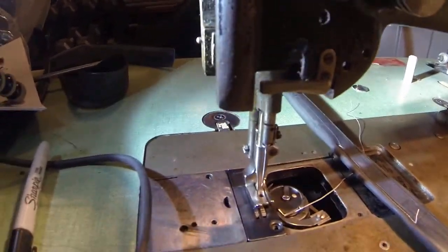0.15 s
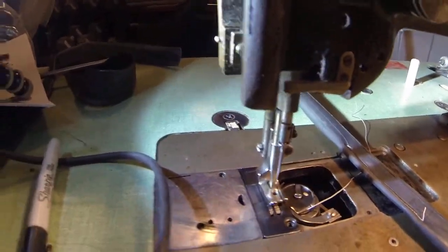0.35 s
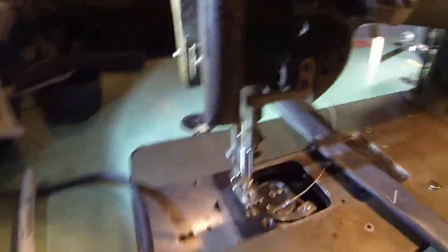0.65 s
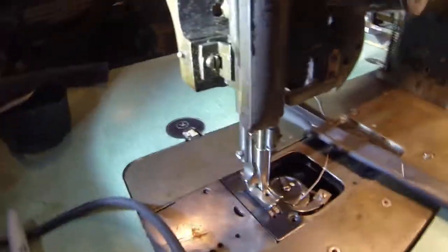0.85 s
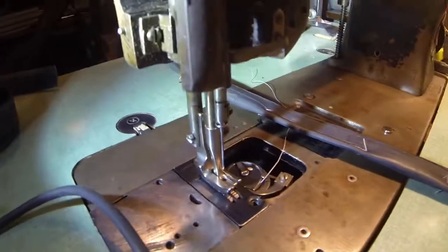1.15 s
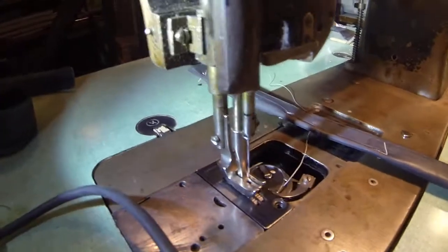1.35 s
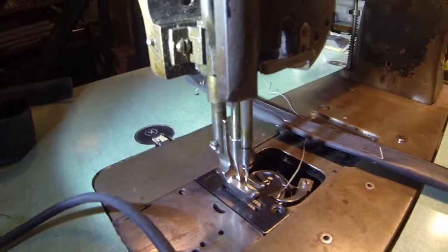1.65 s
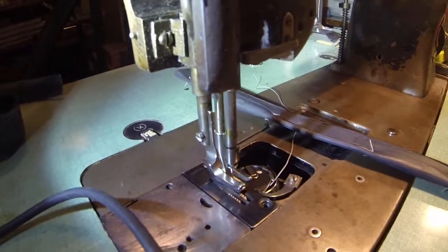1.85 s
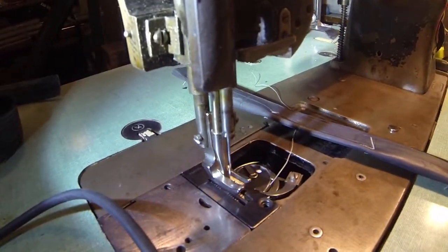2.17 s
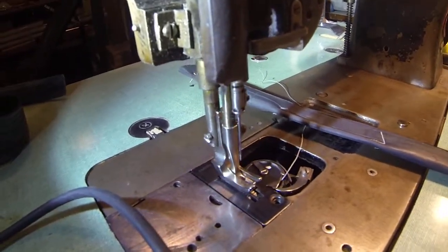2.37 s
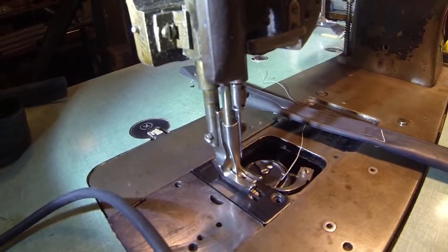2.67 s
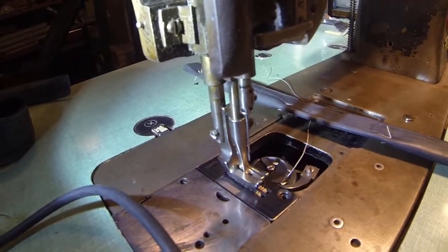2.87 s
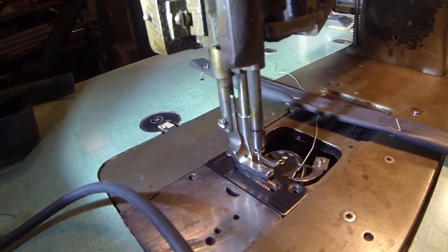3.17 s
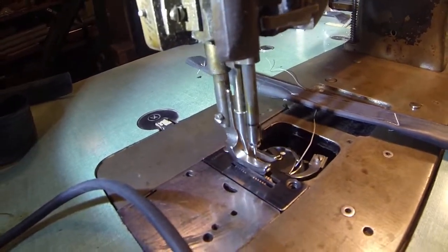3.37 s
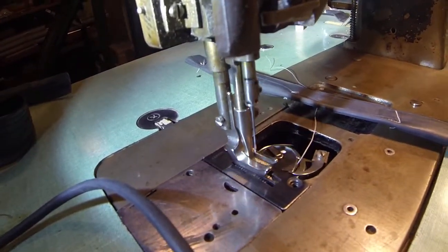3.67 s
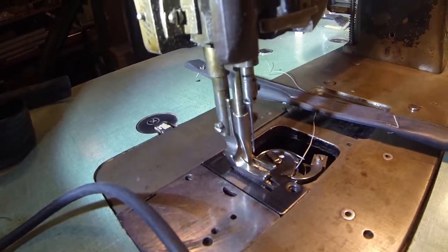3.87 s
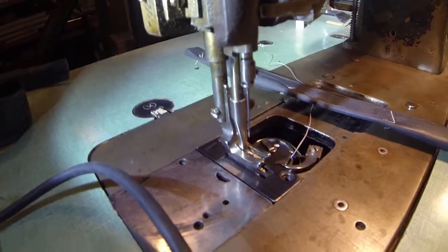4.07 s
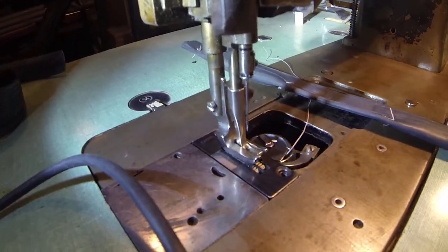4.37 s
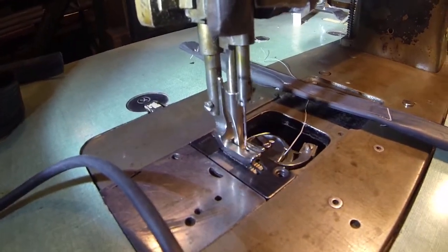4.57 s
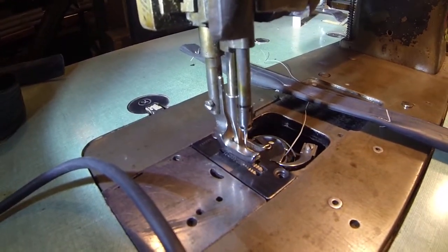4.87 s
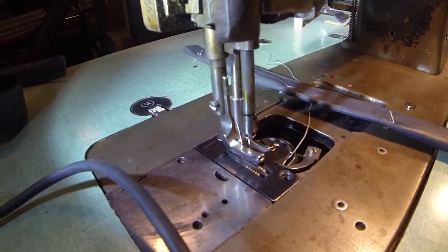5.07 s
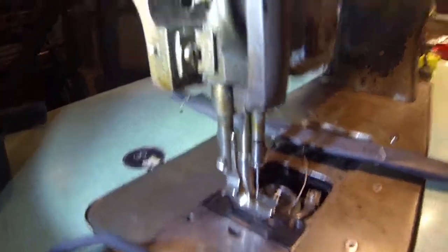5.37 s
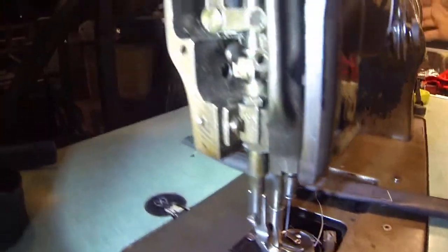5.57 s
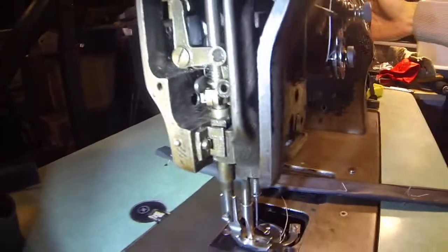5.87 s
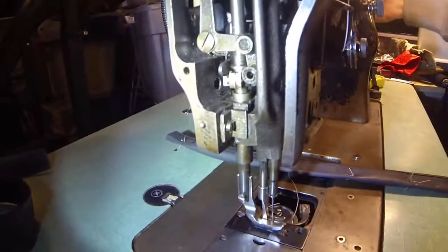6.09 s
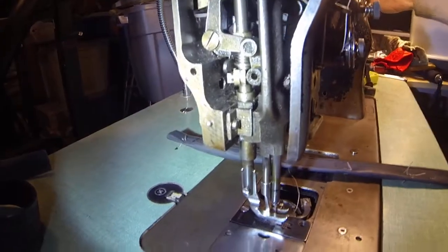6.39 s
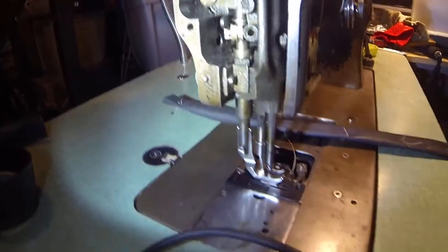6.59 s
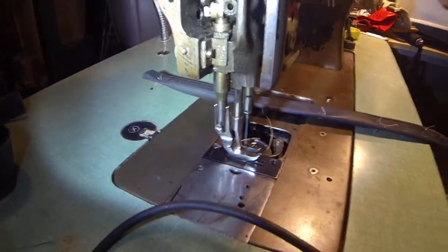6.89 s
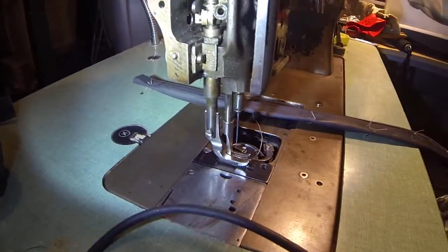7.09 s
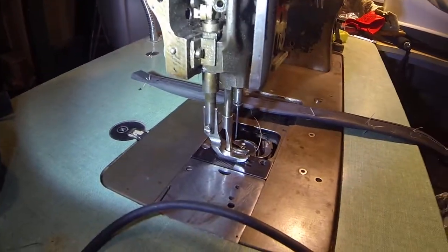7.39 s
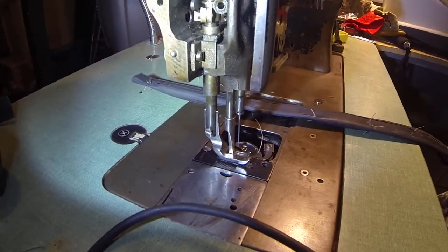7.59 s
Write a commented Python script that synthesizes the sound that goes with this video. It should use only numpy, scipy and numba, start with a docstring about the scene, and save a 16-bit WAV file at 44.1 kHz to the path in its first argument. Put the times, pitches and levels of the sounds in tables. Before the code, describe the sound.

The tail of a metal clang fades under small plastic creaks, then fingers hit and rub the camera case very loudly, with a sharp squeak. Afterwards a heavy old sewing machine is turned by hand in uneven pushes: low gear whirr, rattling bars, metallic knocks, thin ticks and dull table thuds. Small, lightly echoing workshop; hand-held camera microphone, faint hiss and whine.

```python
"""Fingers bump and rub the case of a hand-held camera over the last ring of a metal clang; then a heavy
sewing machine, turned by hand in a small workshop, whirrs, knocks, ticks and thuds.
Machine: gritty noise through resonances for the gears and bars, struck modes for knocks and thuds, noise
bursts for ticks. Fingers: enveloped grit through the case panels, a pressure push and a gliding squeak.
Faint hiss and pulsing whines lie below; the camera's gain control ducks and creeps back."""
import sys
import numpy as np
from scipy import signal
from scipy.fft import rfft, irfft
from scipy.io import wavfile
from scipy.ndimage import uniform_filter1d
from numba import njit

SR = 44100
rng = np.random.default_rng(int(sys.argv[2]) if len(sys.argv) > 2 else 0)


def transcribe(signal):
    """Save signal, clipped to [-1, 1], as a 16-bit WAV file at the path in sys.argv[1]."""
    frames = np.atleast_2d(signal).T
    limited = np.clip(frames, -1, 1)
    pcm = np.round(limited * 32767).astype(np.int16)
    wavfile.write(sys.argv[1], SR, pcm)


N = 341334
T = np.arange(N) / SR


def undb(db):
    """Amplitude gain of a dB value."""
    return 10 ** (np.asarray(db) / 20)


def unit(x):
    """Scaled to rms 1."""
    return x / np.sqrt(np.mean(x ** 2))


def fade(t, t60):
    """Exponential decay: -60 dB at t60."""
    return np.exp(-np.log(1000) * t / t60)


def band(x, hz, width_hz):
    """Resonance with gain 1 at the centre."""
    return signal.lfilter(*signal.iirpeak(min(hz, .45 * SR), hz / width_hz, fs=SR), x)


def steep(x, hz, width_hz):
    """Resonance applied twice; each pass is wider so that the pair is about width_hz wide."""
    pass_width_hz = 1.55 * width_hz
    return band(band(x, hz, pass_width_hz), hz, pass_width_hz)


def coloured(points):
    """Noise of rms 1, its spectrum drawn through (f/Hz, density/dB) points."""
    hz, db = np.transpose(points)
    f = np.arange(N // 2 + 1) * SR / N + 1
    gain = undb(np.interp(np.log(f), np.log(hz), db))
    return unit(irfft(rfft(rng.standard_normal(N)) * gain, N))


def walk(rate_hz):
    """Random values 1 / rate_hz apart, joined by straight lines; spread near 1."""
    k = int(SR / rate_hz)
    return uniform_filter1d(np.repeat(rng.standard_normal(N // k + 1), k), k)[:N]


def grit(spread_db, rate_hz):
    """Stick-slip friction as dense noise of rms 1, its level wandering in patches."""
    return unit(rng.standard_normal(N) * undb(spread_db * walk(rate_hz)))


def add(out, s, sound, peak_db):
    """Lay a sound of the given peak level in at time s."""
    i = int(s * SR)
    out[i:i + len(sound)] += (undb(peak_db) * sound / np.abs(sound).max())[:N - i]


def ring(modes, share, scatter_db=5.5, rise_s=0.00021, size=9000):
    """Modes after one blow, ringing for a share of their free t60; pitch, phase and level scatter."""
    t = np.arange(size) / SR
    hz, db, t60 = np.array(modes, float).T[:, :, None]
    chance = rng.standard_normal((3, len(hz), 1))
    tone = np.sin(2 * np.pi * hz * (1 + .015 * chance[0]) * t + 1.01 * chance[1])
    level = undb(db + scatter_db * chance[2]) * fade(t, share * t60)
    return (level * tone).sum(0) * (1 - np.exp(-t / rise_s)) ** 2


def snaps(table, width_share, size=6000):
    """Decaying noise bursts round a centre; rows (t/s, peak level/dB, f/Hz, t60/s)."""
    out, t = np.zeros(N), np.arange(size) / SR
    for s, db, hz, t60 in table:
        burst = rng.standard_normal(size) * fade(t, t60)
        add(out, s, steep(burst, hz, width_share * hz), db)
    return out


# pushes on the hand wheel: (t of fastest turn/s, build-up/s, run-down/s,
# whirr peak level/dB, rattle peak level/dB, rumble peak level/dB)
HAND_PUSHES = [(.17, 0.44, 0.55, -52, -73, -57), (.67, 0.12, .4, -66, -55.5, -48),
               (.97, 0.18, 0.18, -63, -45.5, -56), (1.29, .3, 1, -60, -64.5, -57),
               (1.8, 0.36, 0.26, -59.5, -58, -54.5), (2.06, .15, .3, -59, -66, -62),
               (2.181, 0.34, 0.27, -48.5, -57.5, -50), (2.3, 0.091, 0.32, -56.5, -64, -50),
               (2.45, .2, .2, -56.5, -80, -58.5), (2.76, 0.14, 0.44, -57, -58.5, -70),
               (2.95, 0.26, 0.27, -44, -52.5, -53), (3.25, 0.52, 0.33, -59.5, -66, -64),
               (3.49, 0.16, .3, -56, -57.5, -64), (3.62, 0.22, 0.15, -43.5, -54, -55.5),
               (4.16, 0.12, 0.47, -65.5, -61.5, -60), (4.3, 0.2, 0.46, -55.5, -59.5, -63),
               (4.42, 0.58, 0.73, -51.5, -62.5, -69), (4.61, .2, 0.38, -54, -59.5, -51),
               (5.15, .15, .3, -60.5, -68, -67), (5.28, 0.28, .3, -56, -56.5, -53),
               (5.45, 0.24, 0.23, -44.5, -51.5, -47.5), (5.72, 0.19, 0.18, -63, -54, -47.5),
               (5.9, 0.23, 0.33, -54, -53.5, -62), (6.09, 0.28, 0.21, -45.5, -58, -45.5),
               (6.75, 0.32, 0.35, -52, -59, -51), (6.92, 0.4, 0.19, -53, -57, -49.5),
               (7.07, .1, 0.25, -62, -73, -58), (7.6, 0.31, 0.38, -51.5, -65, -63),
               (7.74, 0.13, .2, -40.5, -50, -50)]
PUSH_SWELL_DB = 21.5  # rise over build-up, fall over run-down


def pushed(column, late_s=0.):
    """Level of one layer: each push swells and runs down linearly in dB; the strongest is heard."""
    s, build_s, run_down_s, *peaks_db = np.array(HAND_PUSHES).T[:, :, None]
    coarse_t = T[::64]
    t = coarse_t - s - late_s
    db = peaks_db[column] - PUSH_SWELL_DB * np.where(t < 0, -t / build_s, t / run_down_s)
    return np.interp(T, coarse_t, undb(db.max(0)))


# arm resonances rung by the gear teeth: (f/Hz, width/Hz, relative level/dB)
GEAR_MODES = [(305.8, 34, 2.5), (334, 25, -6), (492, 100, -8.5), (606, 150, -16.5)]
# resonances rung by sliding bars: (f/Hz, width/Hz, relative level/dB)
BAR_MODES = [(750, 200, -9), (1050, 110, -4), (1450, 170, -7), (1720, 100, 0), (2100, 200, -6),
             (2430, 120, -5), (2780, 120, -8), (3550, 300, -18)]
RUMBLE_LATE_S = .03


def turning():
    """Gear teeth whirr in the low arm modes, sliding bars chatter higher up, the table rumbles late."""
    whirr, rattle = pushed(column=0), pushed(column=1)
    rumble = pushed(column=2, late_s=RUMBLE_LATE_S)
    teeth, together = grit(2.1, 60), undb(3. * walk(120))
    gears = sum(undb(db) * steep(teeth, hz, width) for hz, width, db in GEAR_MODES)
    # each bar catches by itself, and all of them when the wheel jerks
    bars = sum(undb(db) * steep(together * grit(4.1, 90), hz, width) for hz, width, db in BAR_MODES)
    table = steep(grit(1.7, 30), 80, 100)
    return whirr * unit(gears) + rattle * unit(bars) + rumble * unit(table)


CHATTER_DB, CHATTER_T60_S = -9.5, .04


def chatter(sound):
    """A slack joint's blow and four quick, weaker rebounds of random sign."""
    at = np.cumsum(rng.uniform(.0015, .006, size=4))
    blows = np.zeros(SR // 40)
    blows[0] = 1
    signs = rng.choice([-1, 1], size=4)
    blows[(at * SR).astype(int)] = undb(CHATTER_DB) * fade(at, CHATTER_T60_S) * signs
    return signal.fftconvolve(sound, blows)


# linkage knocks: (t/s, middle-part peak level/dB, low part re middle/dB, tilt/(dB/octave))
LINKAGE_KNOCKS = [(0.2874, -36, -3, -11), (1.3677, -36.5, -6.5, -7), (2.0263, -45.5, 4, -7),
                  (2.053, -51, -2, -1.5), (2.0738, -46, 3, -6), (2.1723, -25.5, -4, -4),
                  (2.1879, -26.5, -5, -1.5), (2.209, -44, 8, -8), (2.2322, -38.5, -0.5, 12),
                  (2.2993, -41, -22, -7), (2.39, -49.5, -6, -13), (2.4495, -45.5, -9.5, 0),
                  (2.4578, -42, -3, -23), (2.7157, -46, -1.5, -11), (2.8415, -37, -15, 3),
                  (2.8797, -37, -16, 3), (2.913, -32, -10, -2), (2.9427, -34.5, -8, -22),
                  (2.9653, -32, -2.5, -7), (2.98, -28, -9, 3), (2.996, -23.5, -8, 7),
                  (3.0282, -37, -6, -11), (3.479, -43.5, 0.5, 1), (3.5991, -38.5, 0, -6),
                  (3.6092, -25, -4, -1), (3.6282, -26.5, -1.5, 1), (3.676, -36.5, -5, 9),
                  (4.0122, -31.5, -3, -15), (4.048, -41, -1, -9), (4.07, -48, 0, -12),
                  (4.1418, -31.5, -18, -19), (4.2879, -45, 0, -2), (4.3725, -38, -14, 2.1),
                  (4.421, -40, -12, 0), (4.4687, -37, -5, -5), (4.5103, -42, 0, -19), (4.5464, -36, -4, -8),
                  (4.569, -31, -2, -1), (4.5853, -32.5, -3, -5), (4.649, -46, -10, -9),
                  (4.715, -44, -11, -6), (5.3224, -36, -9, 8), (5.423, -28, -2.5, 5),
                  (5.4391, -24.5, -8, -1.5), (5.9355, -37, -3.5, 5), (5.975, -38, -4, 10),
                  (6.011, -36, -5, 6), (6.0669, -40, 5, 6), (6.085, -32, -4, -4), (6.102, -28, -1, 11),
                  (6.1439, -42, 1, -7.5), (6.2624, -51.5, -5, 2), (6.561, -48, -16, 5),
                  (6.595, -50, -0.5, -9), (6.6817, -46.5, -10, 12), (6.7241, -41, -3, 2),
                  (6.8354, -30, -0.5, 0), (6.8444, -30, -0.5, 4), (6.852, -28, 0, 4), (6.8693, -45, 13, 3),
                  (7.073, -36, -9, -17), (7.398, -50, -9, 5.5), (7.5451, -41.5, -2, 5),
                  (7.583, -39, -3.5, 12), (7.6198, -43, 5, 6), (7.651, -46, 9.5, 3), (7.685, -38, -8, 10),
                  (7.7056, -35.5, -4.5, 1)]
# modes of the cast arm: (f/Hz, relative level/dB, free t60/s)
ARM_MODES = [(305, 2.5, 0.062), (347, -1.5, 0.23), (487, -13, 0.086), (640, -4.5, 0.066), (848, -18, 0.058),
             (1075, -2.5, 0.024), (1280, -3.5, 0.04), (1520, -1.5, 0.035), (1753, 2.5, 0.023),
             (1927, -1.5, 0.03), (2096, -6.5, 0.073), (2290, -4.5, 0.05), (2456, -2, 0.041),
             (2640, -13.5, 0.036), (3100, -20.5, 0.036), (3560, -9.5, 0.048), (4560, -9, 0.018),
             (5100, -6.5, 0.0185), (5650, -10.5, .03), (6440, -5, 0.019), (8090, -8, 0.024)]
KNOCK_RING, RING_PER_DB = .48, -.008  # share of free t60 at 0 dB, change per dB: hard blows damp sooner
KNOCK_BRIGHT_DB, BRIGHT_PER_TILT = -13, .36  # top modes re middle; dB per (dB/octave) of tilt
LOW_LATE_S = .00076


def knocks():
    """Slack joints take up with a blow into the cast arm; softer contacts favour the lower modes."""
    out = np.zeros(N)
    low, middle, bright = ARM_MODES[:4], ARM_MODES[4:15], ARM_MODES[15:]
    for s, db, low_db, tilt_db in LINKAGE_KNOCKS:
        share = np.clip(KNOCK_RING + RING_PER_DB * db, .2, 1)
        struck = [(hz, mode_db + tilt_db * np.log2(hz / middle[0][0]), t60) for hz, mode_db, t60 in middle]
        add(out, s, chatter(ring(struck, share)), db)
        add(out, s, ring(bright, share), db + KNOCK_BRIGHT_DB + BRIGHT_PER_TILT * tilt_db)
        add(out, s + LOW_LATE_S, ring(low, share), db + low_db)
    return out


LOOSE_PER_S, LOOSE_DB, LOOSE_SCATTER_DB = 39, 6, 4  # mean rate; level re rattle; spread


def loose_parts():
    """Loose parts tick at random, following the rattle level, with four kinds of arm ring."""
    hits = (rng.random(N) < LOOSE_PER_S / SR) * undb(LOOSE_SCATTER_DB * rng.standard_normal(N))
    hits = hits * pushed(column=1) * undb(LOOSE_DB)
    kind, out = rng.integers(0, 4, size=N), 0
    for k in range(4):
        tick = ring(ARM_MODES[5:17], .5)
        out = out + signal.fftconvolve(hits * (kind == k), tick / np.abs(tick).max())[:N]
    return out


# ticks of thin parts: (t/s, peak level/dB, f/Hz, t60/s)
THIN_TICKS = [(0.2868, -31.5, 5470, 0.016), (0.409, -31, 2400, .016), (0.8619, -51, 5480, 0.027),
              (0.883, -39.5, 5300, 0.03), (1.7792, -29.5, 6010, 0.082), (1.788, -19, 9000, 0.014),
              (1.8308, -36, 4900, 0.024), (1.9746, -42, 5970, 0.024), (2.4481, -41, 6130, 0.059),
              (2.7177, -41, 5100, 0.061), (2.9951, -32.5, 4930, 0.034), (3.0594, -47, 8500, 0.03),
              (3.1106, -45.5, 8600, 0.087), (3.1672, -27, 9250, 0.032), (3.27, -41, 4840, 0.017),
              (3.4365, -43, 6740, 0.041), (4.2662, -37, 4770, 0.019), (4.6094, -47, 6260, 0.027),
              (4.8193, -49, 4750, 0.036), (4.9387, -47.5, 3700, 0.027), (5.102, -39.5, 4720, 0.022),
              (5.6004, -40.5, 6240, 0.048), (6.6871, -41, 5800, 0.037), (6.9183, -43, 9200, 0.027),
              (7.1, -49, 4000, .03), (7.1384, -43.5, 3860, 0.03)]


def ticks():
    """Thin parts tick: short noise bursts in broad bands."""
    return snaps(THIN_TICKS, width_share=.99)


# table thuds: (t/s, tone peak level/dB, f/Hz, free t60/s, boom re tone/dB)
TABLE_THUDS = [(1.311, -53, 210, 0.14, 5.5), (1.784, -43, 215, 0.15, -16), (2.066, -39.5, 193, 0.13, -7.5),
               (2.969, -37.5, 154, 0.093, 4.5), (3.02, -41.5, 189.5, 0.42, 1.5),
               (3.513, -34, 205, 0.06, -8), (3.55, -36.5, 225, 0.057, -10), (4.152, -51, 184, 0.13, 9),
               (4.538, -41, 152, 0.086, 3), (5.316, -38, 204, 0.26, -6.5), (6.066, -43, 171, 0.16, 6.5),
               (6.359, -28, 201.5, 0.11, -17.5), (6.756, -34.5, 194.3, 0.055, -17.5),
               (6.785, -42, 250, 0.14, -20), (7.684, -39, 250, 0.072, -0.5)]
THUD_RISE_S = 0.0021


def thuds():
    """The table top answers the feed with a short tone and a longer boom; a soft push makes both swell."""
    out = np.zeros(N)
    boom_modes = [(83, 3.5, 0.25), (104.8, 3.4, 0.72), (161.0, 3.5, 0.16)]  # f/Hz, level/dB, t60/s
    for s, db, hz, t60, boom_db in TABLE_THUDS:
        add(out, s, -ring([(hz, 0, t60)], 0.93, rise_s=THUD_RISE_S), db)
        add(out, s, ring(boom_modes, 1.0, rise_s=THUD_RISE_S, size=20000), db + boom_db)
    return out


# finger strokes on the case: (t of start/s, attack/s, hold/s, release/s,
# hiss level/dB, middle re hiss/dB, low re hiss/dB)
FINGER_STROKES = [(0.542, 0.0011, .008, .02, -24, -7.5, -30), (0.544, 0.011, 0.007, 0.042, -20, -6.5, -17),
                  (.596, .004, .036, .01, -41, -1, -5.5), (0.628, .004, .008, .04, -25, -10, -9),
                  (0.642, 0.0053, .012, 0.023, -26, 4, 8.5), (.65, 0.0236, .013, .004, -14, 1.5, -2),
                  (0.685, 0.0019, .004, .028, -20, 2, -8), (0.704, .002, 0.027, .015, -35, 5, 5),
                  (0.769, .02, 0.076, .02, -58.5, 5.5, -8), (.86, 0.02, .002, 0.012, -42.5, 0, 8.5),
                  (0.887, 0.046, 0.12, 0.013, -38.5, 0.3, -4),
                  (1.047, 0.036, 0.0023, 0.026, -34.5, 1.5, -8.5),
                  (1.131, 0.0054, 0.0098, 0.0072, -52, 3, 8.5), (1.19, 0.012, 0.027, 0.023, -37.5, 3, -5.5),
                  (1.24, .002, 0.019, .035, -54.5, 5.5, -1.5), (1.408, 0.0066, .004, 0.022, -50, 8, 3),
                  (1.48, 0.013, 0.025, 0.016, -49, 8, -0.5), (1.716, 0.0058, .015, 0.026, -50.5, 4.5, 4),
                  (3.434, .01, .04, 0.089, -66, 2, 3), (3.946, 0.007, 0.0022, 0.011, -60, 4, 13),
                  (3.973, 0.011, .002, 0.014, -50, 0, 5.5), (3.983, 0.039, 0.0039, 0.041, -47.5, 1, 10),
                  (5.182, 0.072, 0.18, .01, -52.5, 4.5, 5), (5.361, 0.038, 0.041, 0.027, -42, 2.5, 3.2),
                  (5.446, 0.026, .002, .02, -46.5, 6, 9.5), (5.474, 0.028, 0.0046, 0.03, -44.5, 1, 5),
                  (5.54, 0.03, 0.043, .01, -66.5, 6.5, 3), (5.618, .045, .008, 0.062, -49, 2, 5),
                  (5.693, 0.026, 0.051, 0.024, -52, 2.5, 4.5), (5.793, .004, .003, 0.011, -57, 0, 2),
                  (5.802, 0.022, .025, 0.011, -60, 0, -1), (5.846, .012, 0.0017, 0.01, -42, 2.5, 0.5),
                  (5.866, .005, 0.062, 0.057, -57.5, -8, 5), (5.947, 0.14, .025, 0.082, -53, 3, 7),
                  (6.879, 0.042, .02, .04, -60, 1, 2)]
# camera case panels, in low, middle, hiss and airy groups: (f/Hz, width/Hz, level within group/dB)
CASE_PANELS = [(224, 109, 2), (630, 440, -7), (1300, 340, 0), (1990, 390, -9.5), (3073, 960, -4.5),
               (3920, 540, -1.5), (5300, 640, -4.5), (6260, 640, -6), (8060, 1100, -4), (9870, 1900, -10)]
# airy rustle as the camera swings: t/s of (in, full, full, out)
RUSTLE_CORNERS = [5.2, 5.3, 6.08, 6.18]
RUSTLE_DB, STROKE_EDGE_DB = -65, -21  # rustle level; stroke ends re hold
AIRY_DB, LIGHT_DB, AIRY_PER_DB = -14.5, -49.5, 0.57  # airy re hiss; airier by dB per dB below LIGHT_DB


def strokes():
    """Skin drags over the plastic case and rings its panels; strokes start and stop abruptly."""
    gains = np.zeros((4, N))
    for s, attack, hold, release, db, middle_db, low_db in FINGER_STROKES:
        corners = np.cumsum([s, attack, hold, release])
        on = slice(int(s * SR), int(corners[-1] * SR))
        shape_db = db + np.interp(T[on], corners, [STROKE_EDGE_DB, 0, 0, STROKE_EDGE_DB])
        airy_db = AIRY_DB + AIRY_PER_DB * max(LIGHT_DB - db, 0)
        parts_db = np.array([[low_db], [middle_db], [0], [airy_db]])
        gains[:, on] = np.maximum(gains[:, on], undb(shape_db + parts_db))
    gains[3] = np.maximum(gains[3], undb(RUSTLE_DB) * np.interp(T, RUSTLE_CORNERS, [0, 1, 1, 0]))
    gains = uniform_filter1d(gains, size=60)
    groups = CASE_PANELS[:2], CASE_PANELS[2:4], CASE_PANELS[4:8], CASE_PANELS[8:]
    skin, out = grit(1.5, 500), 0
    for gain, panels in zip(gains, groups):
        # neighbouring panels in opposite phase
        tone = sum((-1) ** k * undb(db) * steep(skin, hz, w) for k, (hz, w, db) in enumerate(panels))
        out = out + gain * unit(tone)
    return out


# sharp slips and taps of a finger: (t/s, peak level/dB, f/Hz, t60/s)
FINGER_SLIPS = [(0.553, -20, 1290, 0.021), (.597, -25, 1260, .012), (0.634, -13.5, 1310, 0.01),
                (0.652, -5, 1675, 0.011), (0.685, 6.5, 1166, 0.011), (5.505, -28, 1030, 0.054),
                (5.6242, -35, 1000, 0.022), (5.675, -26.5, 980, 0.034), (5.855, -24, 630, 0.019),
                (6.361, -34, 1064, .014)]
# creaks of the case in the grip: (t/s, peak level/dB, f/Hz)
CASE_CREAKS = [(0.109, -46.5, 1300), (0.153, -48, 1120), (0.2003, -43.5, 1270), (0.2386, -51, 1310),
               (0.312, -48, 1050), (0.341, -46, 1300), (0.3885, -49, 1390), (0.477, -49, 1080)]
CREAK_T60_S = 0.057


def slips_and_creaks():
    """Finger slips snap in broad noise bands; the gripped case creaks in narrower ones."""
    creaks = [row + (CREAK_T60_S,) for row in CASE_CREAKS]
    return snaps(FINGER_SLIPS, .5) + snaps(creaks, .2)


# skin squeak in the hard stroke: (t/s, f/Hz, level before flutter/dB)
SKIN_SQUEAK = [(.6, 2270, -60), (.607, 2277, -36), (.626, 2300, -33.5), (.633, 2308, -63),
               (.655, 1300, -52.5), (.664, 1494, -5.5), (0.681, 2098, -15.5), (0.701, 2067, -19),
               (.72, 1590, -30), (.74, 1400, -55.5)]
PRESS_DB, PRESS_S, PRESS_RISE_S, LET_GO_S = 3., .6437, .0035, .0018
SWING, SWING_HZ, SWING_T60_S, SWING_ENDS_S = 0.36, 15, 0.24, .689  # SWING: share of the push


def hard_stroke():
    """A push on the microphone lets go and its air swings back; the skin gives a rough, gliding squeak."""
    top = PRESS_S + PRESS_RISE_S
    gone = top + LET_GO_S
    after = np.maximum(T - gone, 0)
    swing = -SWING * np.cos(2 * np.pi * SWING_HZ * after) * fade(after, SWING_T60_S) * (T < SWING_ENDS_S)
    press = np.where(T < gone, np.interp(T, [PRESS_S, top, gone], [0, 1, -SWING]), swing)
    s, hz, db = np.transpose(SKIN_SQUEAK)
    tone = np.sin(2 * np.pi * np.cumsum(np.interp(T, s, hz)) / SR)
    squeak = undb(np.interp(T, s, db, left=-200, right=-200)) * tone * walk(400)
    return undb(PRESS_DB) * uniform_filter1d(press, size=40) + squeak


# modes of the clang: (f/Hz, relative level/dB, free t60/s)
CLANG_MODES = [(444, 4, 0.48), (504, 7, .6), (625, -6, .3), (4070, -12, .3), (4600, -12, .3),
               (5800, -14, .15), (8450, -1, .2)]
# spectrum of its noise: (f/Hz, density/dB)
CLANG_NOISE = [(180, -35), (300, -7), (467, -7), (647, -9), (714, -14), (1650, -16), (2320, -16.5),
               (8600, -10.5), (15000, -38)]
CLANG_DB, CLANG_HISS_DB, CLANG_HISS_T60_S = -35.5, -32.5, 0.24


def clang():
    """The tail of a metal clang just before the start: fading modes and noise."""
    out = undb(CLANG_HISS_DB) * coloured(CLANG_NOISE) * fade(T, CLANG_HISS_T60_S)
    add(out, 0, ring(CLANG_MODES, 0.82, size=20000), CLANG_DB)
    return out


# room air spectrum: (f/Hz, density/dB)
AIR_SPECTRUM = [(12, -37.5), (20, 0), (54, -7), (95, -9), (207, -14.5), (534, -25), (857, -25.5),
                (1410, -28.5), (3750, -29.5), (8640, -35), (11400, -43.5), (14300, -44), (15500, -36)]
# electric whines: (f/Hz, drift/(rad/s), rms level/dB, pulse sharpness)
WHINES = [(14745, 5, -82, .45), (8430, 130, -76.5, 2.5), (3050, 70, -85, .6)]
AIR_DB, MAINS_HZ = -58.5, 59.5


def background():
    """Room air with a wavering level, and thin electric whines that pulse with the mains."""
    out = undb(AIR_DB + 0.79 * walk(3.03)) * coloured(AIR_SPECTRUM)
    for hz, drift_rad_s, db, sharp in WHINES:
        pulse = np.exp(sharp * np.cos(2 * np.pi * MAINS_HZ * T))
        drift = np.cumsum(drift_rad_s * walk(MAINS_HZ * 2)) / SR
        out += undb(db) * unit(pulse * np.sin(2 * np.pi * hz * T + drift))
    return out


ROOM_T60_S, ROOM_DB = 0.23, -14


def room(x):
    """Diffuse echoes from 4 ms on: the sound convolved with decaying, band-limited noise."""
    t = T[:SR // 2]
    echoes = band(rng.standard_normal(len(t)), 2000, 8300) * fade(t, ROOM_T60_S) * (t > .004)
    return undb(ROOM_DB) * signal.fftconvolve(x, echoes / np.sqrt(np.sum(echoes ** 2)))[:N]


AIR_LOSS_HZ = 10200


def scene():
    """Machine blows lose fine treble on the way and echo in the room; all other layers stay dry."""
    blows = knocks() + loose_parts() + ticks() + thuds()
    blows = signal.sosfilt(signal.butter(2, AIR_LOSS_HZ, fs=SR, output="sos"), blows)
    machine = blows + room(blows) + turning()
    fingers = strokes() + slips_and_creaks() + hard_stroke()
    return (machine + fingers + clang() + background())[None]


@njit
def duck(x, top, fall, rise, db):
    """Gain falls while the output is over the top, and creeps back at a steady rate up to 0 dB."""
    y = np.empty(len(x))
    for i in range(len(x)):
        y[i] = x[i] * 10 ** (db / 20)
        db = min(db + (rise - fall * max(abs(y[i]) - top, 0.)) / SR, 0.)
    return y


GAIN_TOP, GAIN_FALL, GAIN_RISE, GAIN_START_DB = 0.16, 2860, 10.1, -6  # level, dB/s per unit over, dB/s, dB
TOP_HZ = 15200


def record(dry):
    """Camera: gain control, full-scale clip, top cut."""
    held = np.clip(duck(dry[0], GAIN_TOP, GAIN_FALL, GAIN_RISE, GAIN_START_DB), -1, 1)
    return signal.sosfilt(signal.ellip(8, .2, 70, TOP_HZ, fs=SR, output="sos"), held)[None]


dry = scene()
out = record(dry)
transcribe(out)
```